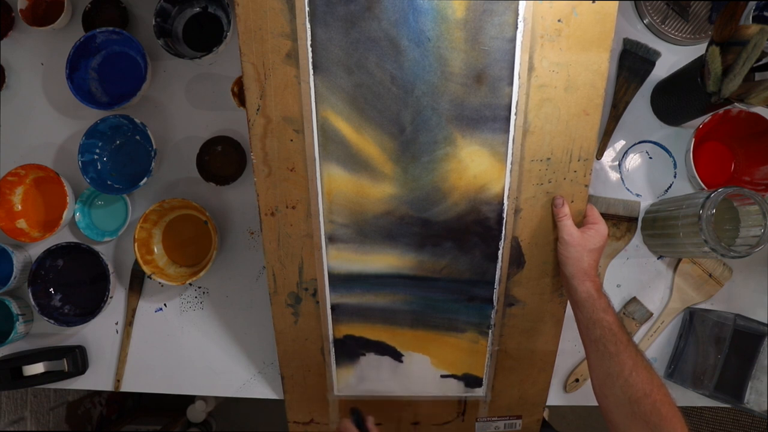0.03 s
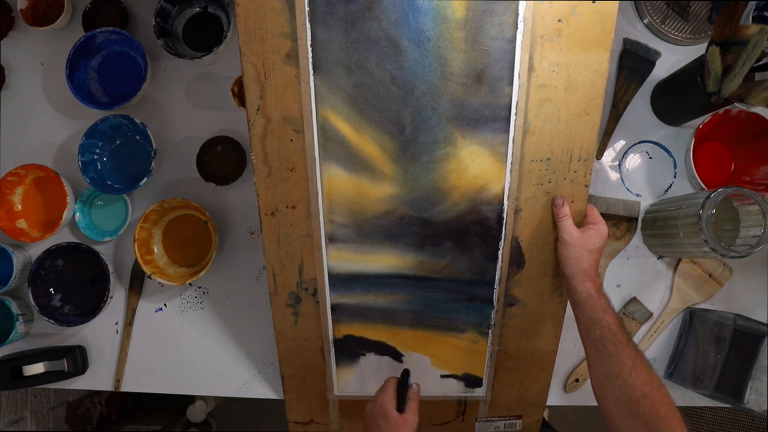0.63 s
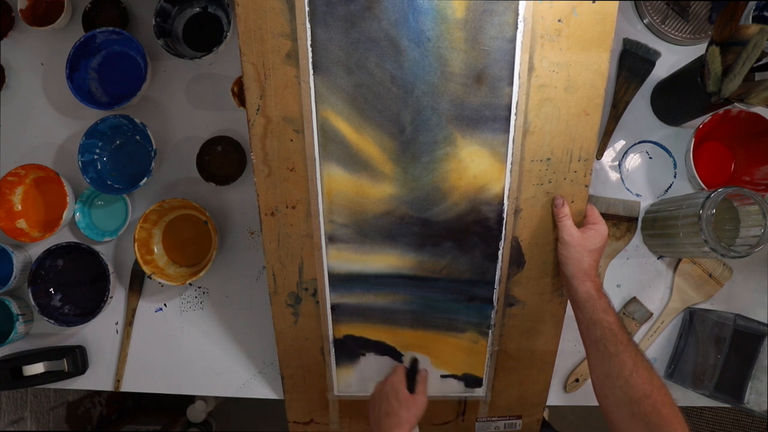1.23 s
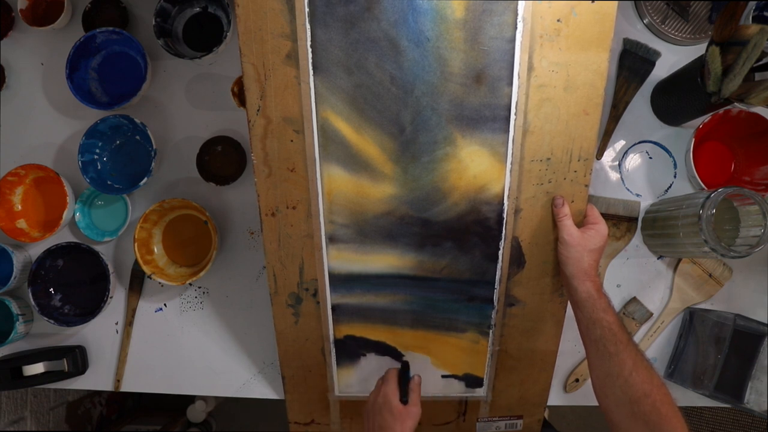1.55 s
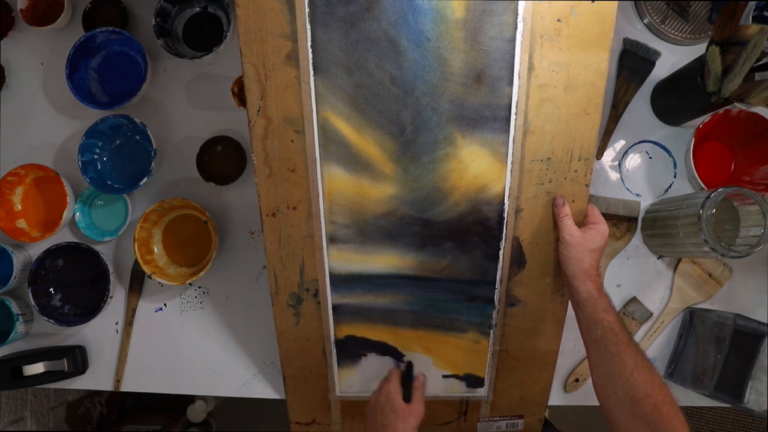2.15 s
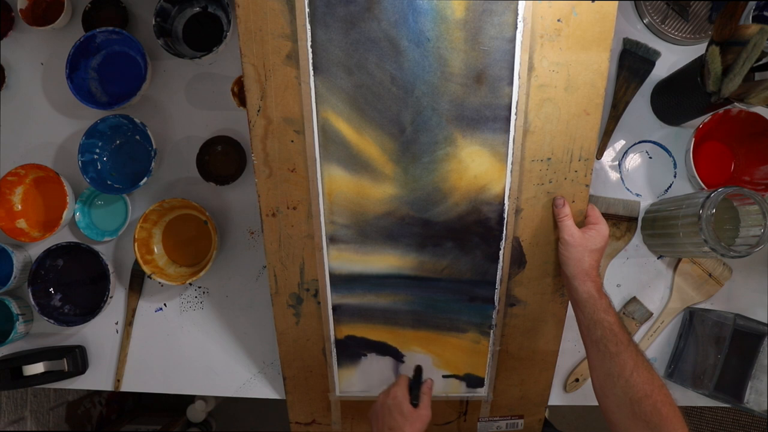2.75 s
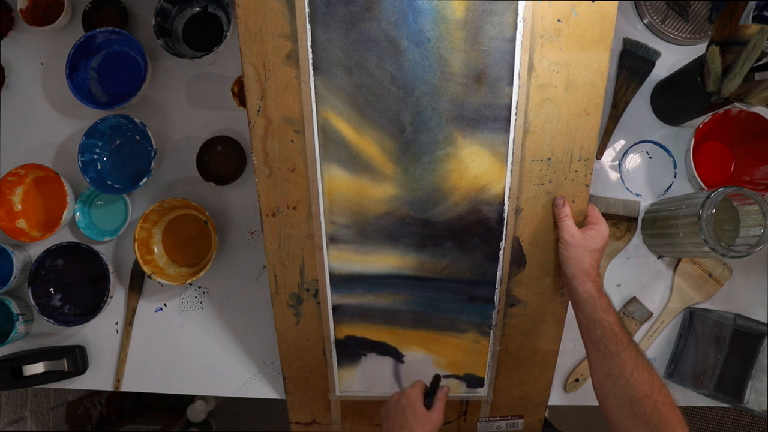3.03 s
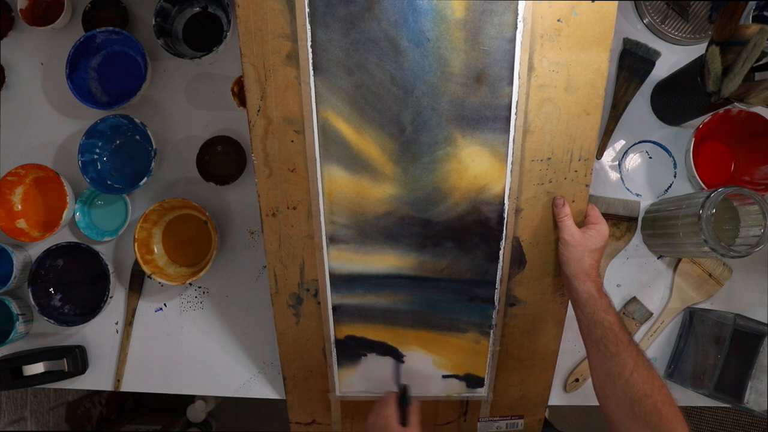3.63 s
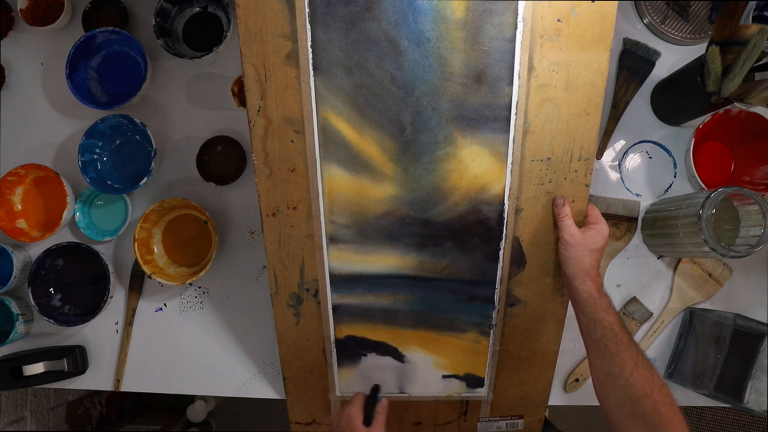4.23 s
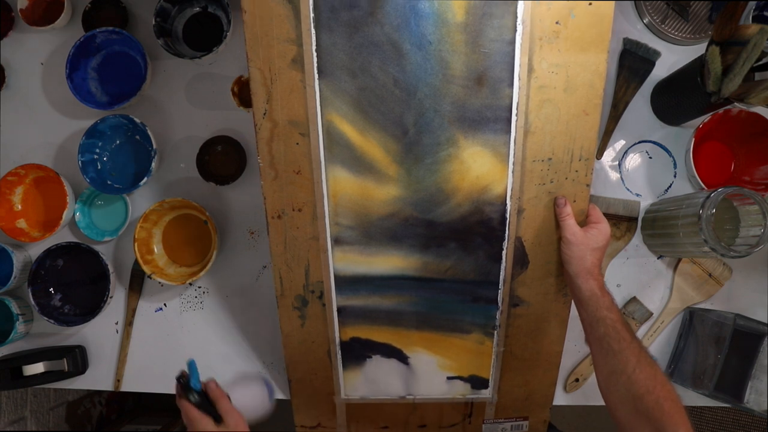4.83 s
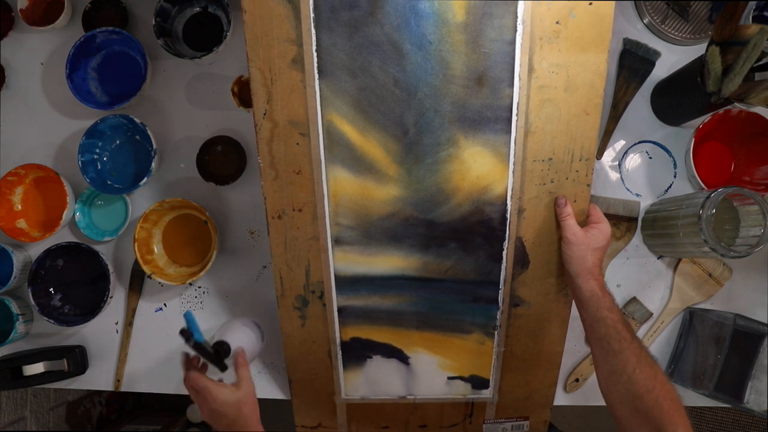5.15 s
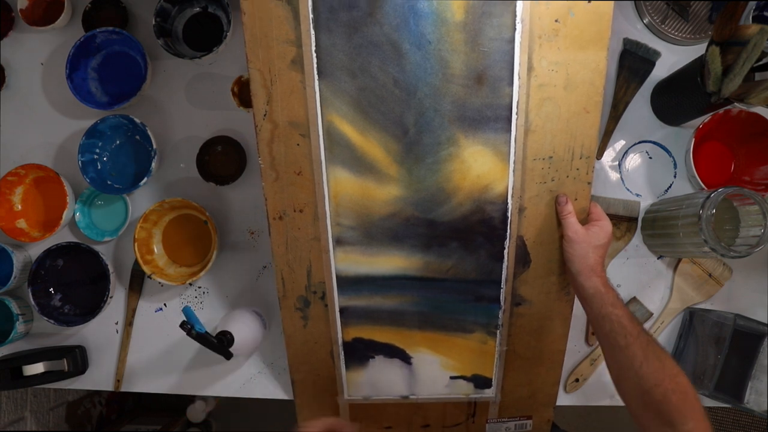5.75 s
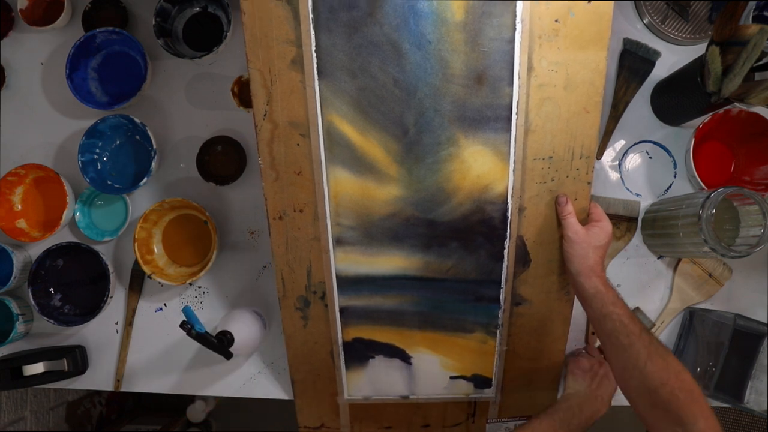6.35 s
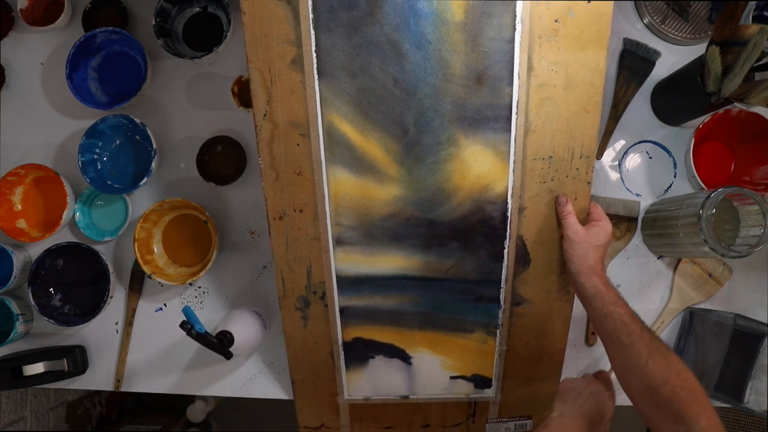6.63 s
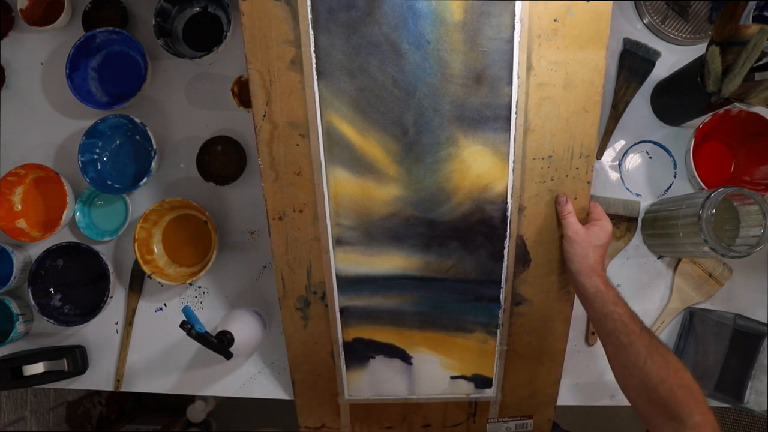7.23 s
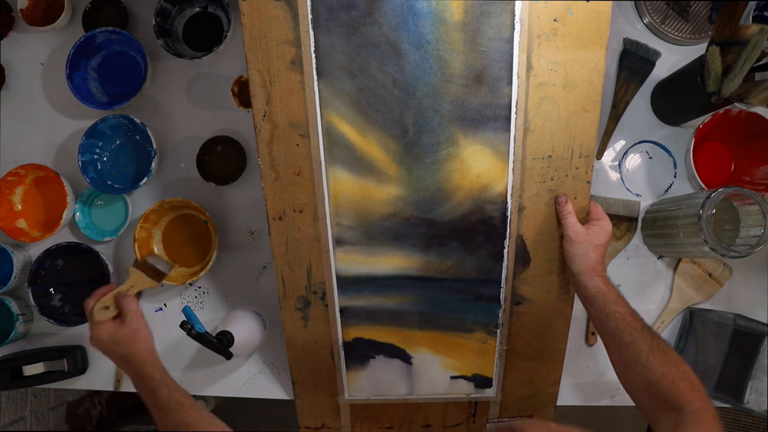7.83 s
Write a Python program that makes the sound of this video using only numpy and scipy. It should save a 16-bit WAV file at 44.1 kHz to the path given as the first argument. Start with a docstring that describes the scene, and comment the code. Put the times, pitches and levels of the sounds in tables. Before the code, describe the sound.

Quick spritzes from a trigger sprayer with water plopping inside, then the bottle knocks onto a table and a brush softly scrapes.

```python
"""Misting paper with a spray bottle

A painter pumps a trigger sprayer close to one microphone in a small studio. Each pull creaks and clicks,
the jet tears into a hiss of droplets, and air pockets plop in the water. The bottle is then thumped
down on a table, where jars clink, and a brush is picked up with soft bumps and scrapes on the wood."""
import sys
import numpy as np
from scipy import signal
from scipy.fft import rfft, irfft, next_fast_len
from scipy.io import wavfile

SR = 44100
rng = np.random.default_rng(int(sys.argv[2]) if len(sys.argv) > 2 else 0)


def generate_wav(signal):
    """Clip the signal to [-1, 1] and save it as 16-bit WAV at the path in sys.argv[1]."""
    frames = np.transpose(np.atleast_2d(signal))
    scaled = np.clip(frames, -1, 1) * 32767
    pcm = np.round(scaled).astype(np.int16)
    wavfile.write(sys.argv[1], SR, pcm)


N = 357210
TIME = np.arange(N) / SR
AGE = np.arange(SR) / SR   # time since a blow [s]

# trigger pulls, the first already under way: (time [s], click [dB], click centre [Hz], creak [dB],
# swell [s], hiss [dB], opening sag [dB], rush [dB re hiss], top [dB re hiss], sheen [dB re hiss],
# sheen delay [s], slosh [dB])
PULLS = [(-0.07, -25, 1500, -60, .065, -30.5, 12, -2, -6, -8, 0.094, -52.5),
         (0.914, -20, 1400, -54, 0.08, -33.5, 23, -2, -2.5, -20, 0.12, -59),
         (1.262, -22.5, 1600, -73, 0.09, -33.5, 37, -1, -1, -16, 0.12, -44),
         (1.669, -22, 1000, -47.5, 0.078, -30.5, 13, -3, -4, -16, 0.12, -50.5),
         (1.962, -22, 1240, -47, 0.089, -32, 28, -4, -1, -2, 0.13, -48.5),
         (2.292, -22, 700, -51, 0.067, -28, 39, -5.5, -1.5, 3, 0.097, -46.5),
         (2.655, -27.5, 1000, -53, 0.076, -30, 16, -4, -3, 5.5, 0.1, -48.5),
         (2.961, -20, 1040, -46, 0.09, -28.5, 12.5, -6.5, -3.5, -3, 0.084, -50),
         (3.326, -16.5, 3600, -52, 0.089, -30, 5, -5, -3, 1, 0.061, -48.5),
         (4.128, -16, 1550, -53.5, 0.074, -30.5, 9, -3, -5.5, -6, 0.11, -47.5),
         (4.375, -22.5, 2100, -54, 0.045, -31.5, 24, -5, -4, -6, .05, -54)]
# the trigger springs back and the pump refills: (time [s], click [dB], snap [dB re click], gulp [dB])
RETURNS = [(0.206, -41.5, -20, -54), (1.544, -20, -2.5, -28.5), (1.882, -23, -21, -21.5),
           (2.203, -33.5, -14, -28.5), (2.585, -31, 4.5, -41), (2.909, -24.5, -2, -28.5),
           (3.242, -24.5, 4, -30), (4.333, -24.5, -13, -26.5)]
# the bottle lands and rocks: (time [s], crack [dB], crack centre [Hz], body [dB], frame [dB], top [dB])
LANDINGS = [(4.9673, -10.5, 3980, -18.5, -12, -9), (5.1433, -27, 3140, -27.5, -25.5, -35),
            (5.187, -13, 1910, -19.5, -15.5, -28.5), (5.232, -30, 1800, -30.5, -27, -23.5),
            (5.405, -43, 1700, -41, -34.5, -37)]
# dull colour of the wooden table: (frequency [Hz], level [dB])
WOOD = [(40, -2.5), (70, -1), (130, -0.5), (200, 4), (290, -1), (370, -6.5), (510, 0.5), (660, -21),
        (1000, -19), (2000, -34), (4000, -62), (8000, -75.5)]


def from_db(db):
    """Decibels to gain."""
    return 10 ** (np.asarray(db) / 20)


def rms_one(x):
    """Scale to unit power."""
    return x / np.sqrt(np.mean(x ** 2) + 1e-20)


def at_hz(points, hz):
    """Read a curve on a log-frequency axis."""
    points = np.array(points)
    return np.interp(np.log(np.maximum(hz, 1)), np.log(points[:, 0]), points[:, 1])


def noise(spectrum, size=N):
    """Noise of a given colour, rms 1."""
    gain = from_db(at_hz(spectrum, np.fft.rfftfreq(size, 1 / SR)))
    return rms_one(irfft(rfft(rng.standard_normal(size)) * gain, size))


def band(x, low_hz, high_hz, order=2):
    """Butterworth band-pass."""
    sos = signal.butter(order, [low_hz, min(high_hz, .45 * SR)], "band", fs=SR, output="sos")
    return signal.sosfilt(sos, x)


def focused(spectrum, centre_hz, slope_db):
    """Narrow a colour by slope_db an octave on both sides of a centre."""
    return [(hz, at_hz(spectrum, hz) - slope_db * abs(np.log2(hz / centre_hz)))
            for hz in np.geomspace(100, 16000, 30)]


def flutter(per_s, depth_db):
    """A gain that wanders at random."""
    knots = rng.standard_normal(N)
    return from_db(depth_db * np.interp(TIME * per_s, np.arange(N), knots))


def swell(middle_s, half_s):
    """A smooth rise and fall of height 1."""
    return np.exp(-.5 * np.minimum(((TIME - middle_s) / half_s) ** 2, 100))


def decay(t60):
    """Exponential decay after a blow."""
    return from_db(-60 * AGE / max(t60, 1e-3))


def burst(spectrum, t60, attack_s=0.0001):
    """Many close, quickly damped modes struck at once."""
    return noise(spectrum, size=SR) * decay(t60) * (1 - np.exp(-AGE / attack_s))


def ringing(modes):
    """Damped sines, each with a slightly new strength and either sign at every blow."""
    return sum(rng.choice([-1, 1]) * from_db(db + rng.standard_normal())
               * np.sin(2 * np.pi * hz * AGE) * decay(t60) for hz, db, t60 in modes)


def grains(per_s, spectrum, t60, spread_db):
    """Random impacts of uneven size, each one of six short bursts; rms 1."""
    sizes = from_db(spread_db * np.minimum(rng.exponential(1, N), 3)) * rng.choice([-1, 1], N)
    hits = sizes * (rng.random(N) < per_s / SR)
    kind = rng.integers(0, 6, N)
    return rms_one(sum(signal.oaconvolve(hits * (kind == k), burst(spectrum, t60)[:SR // 20])[:N]
                       for k in range(6)))


def bubble(hz, cycles, rise, onset_cycles):
    """An air pocket swells, rings and goes up in pitch as it nears the surface."""
    t60 = cycles / hz
    age = AGE[AGE < 2 * t60]
    pitch = hz * (1 + rise * (np.minimum(age / t60, 1) - .2))
    onset = 1 - np.exp(-(age * hz / onset_cycles) ** 2)
    return np.sin(2 * np.pi * np.cumsum(pitch) / SR) * from_db(-60 * age / t60) * onset


def add(track, s, sound):
    """Mix a sound in at a time; what falls outside the track is dropped."""
    start = round(s * SR)
    part = sound[max(-start, 0):N - start]
    track[max(start, 0):max(start, 0) + len(part)] += part


def studio(x, wet_db, early_db, predelay_s=0.0039):
    """Direct sound, a few early reflections and a short diffuse tail."""
    # decay of the room: (frequency [Hz], t60 [s])
    room_t60 = [(200, 0.52), (400, 0.29), (800, 0.55), (1500, 0.38), (4500, 0.34), (9000, 0.39),
                (16000, 0.22)]
    # reflections off the board, table and walls: (delay [s], level [dB])
    echoes = [(.0017, -46), (.0041, -16), (.0078, -13.5), (0.02, -16.5), (0.035, -20.5)]
    edges = np.geomspace(190, 18000, 10)
    tail = sum(band(rng.standard_normal(SR), lo, hi) * decay(at_hz(room_t60, np.sqrt(lo * hi)))
               for lo, hi in zip(edges, edges[1:]))
    tail *= np.clip(AGE / predelay_s - 1, 0, 1)
    out = x + from_db(wet_db) * signal.fftconvolve(x, tail / np.sqrt(np.sum(tail ** 2)))[:N]
    for s, db in echoes:
        add(out, s, from_db(db + early_db) * x)
    return out


def room_tone(air_db=-62.5, hum_hz=125.9, hum_db=-62.5, rumble_trim_db=-2):
    """A bed of still air, a wavering hum and a low rumble that comes and goes."""
    # colour of the still air: (frequency [Hz], level [dB])
    air_colour = [(29, -33.5), (50, -1.5), (122, 5), (306, -5), (362, -5.5), (520, -12), (601, -18),
                  (950, -15), (2210, -16.5), (4450, -24.5), (7040, -25.5), (13200, -26), (16000, -36)]
    # colour of the rumble: (frequency [Hz], level [dB])
    rumble_colour = [(10, -14), (20, -10.5), (30, 3), (43, 1.5), (60, -16.5), (100, -24), (250, -58.5)]
    # rise and fall of the rumble: (time [s], level [dB])
    rumble_ride = [(0.0, -69), (0.16, -55.5), (1.28, -76), (1.49, -42), (1.69, -50.5), (4.17, -79),
                   (4.51, -59), (4.58, -43.5), (4.92, -49), (5.01, -34), (5.16, -37), (5.23, -28.5),
                   (5.8, -58), (6.31, -45), (6.52, -53), (6.68, -41), (7.45, -55), (8.1, -48)]
    hum = from_db(hum_db) * np.sqrt(2) * np.sin(2 * np.pi * hum_hz * TIME) * flutter(19, 1.8)
    rumble_db = np.interp(TIME, *np.transpose(rumble_ride)) + rumble_trim_db
    rumble = from_db(rumble_db) * noise(rumble_colour)
    return from_db(air_db) * noise(air_colour) + hum + rumble


def sliding(rub_trim_db=-3, shuffle_trim_db=-6):
    """Sleeve and brush slide on wood: a grainy rub that rings in the handle, over a dull shuffle."""
    # strokes: (middle [s], half length [s], rub [dB], tilt [dB/octave], shuffle [dB], handle ring [dB])
    strokes = [(4.679, 0.068, -49.5, 1, -41, -73), (4.803, 0.031, -50, -.5, -50, -54),
               (5.217, 0.23, -50, -6.5, -42, -80), (5.68, 0.043, -58, -6, -54, -72),
               (6.06, 0.078, -60.5, 0.5, -57, -74), (6.305, 0.012, -57, 11, -60, -68),
               (6.38, 0.087, -51.5, -5.5, -47, -59.5), (6.563, 0.027, -43, 0.5, -38.5, -56),
               (6.9, 0.2, -64.5, -0.5, -55, -88), (7.135, 0.044, -66, 7, -63, -78),
               (7.328, 0.078, -58, 1, -71, -59.5), (7.683, 0.12, -59, 1.5, -54.5, -78),
               (7.849, 0.024, -59, -3, -40, -80), (8.03, 0.08, -59, -5, -48.5, -73)]
    # colour of the friction: (frequency [Hz], level [dB])
    rub_colour = [(350, -16), (600, -1.5), (1100, 1), (1600, 2.5), (2200, 0), (3300, -3), (4300, -1.5),
                  (5700, -5), (7500, -11), (11000, -13), (16000, -18.5)]
    # resonances of the brush handle: (frequency [Hz], width [Hz], level [dB])
    handle = [(2200, 260, 6), (3300, 410, 4.5), (4380, 370, 4.5), (5760, 480, 4)]
    rub = noise(rub_colour) * flutter(400, 1.9)
    shuffle = rms_one(band(noise(WOOD), 93, 770)) * flutter(40, 0.87)
    scrape = rms_one(sum(from_db(db) * band(rub, hz - width / 2, hz + width / 2, order=1)
                         for hz, width, db in handle))
    size = next_fast_len(N)
    spectrum = rfft(rub, size)
    octaves = np.log2(np.maximum(np.fft.rfftfreq(size, 1 / SR), 300) / 3000)
    out = np.zeros(N)
    for s, half_s, rub_db, tilt_db, shuffle_db, ring_db in strokes:
        tilted = rms_one(irfft(spectrum * from_db(tilt_db * octaves), size)[:N])
        out += swell(s, half_s) * (from_db(rub_db + rub_trim_db) * tilted
                                   + from_db(shuffle_db + shuffle_trim_db) * shuffle
                                   + from_db(ring_db) * scrape)
    return out


def handling(thud_trim_db=-1):
    """Hand and brush thud and tick on the wood, and the brush sets a cup ringing."""
    # bumps on the wood: (time [s], thud [dB], tick [dB], tick centre [Hz], tick t60 [s])
    bumps = [(4.575, -45, -40.5, 1500, .06), (5.879, -60.5, -56, 2200, 0.13),
             (6.008, -71, -41.5, 1830, 0.019), (6.169, -33.5, -47.5, 3500, 0.066),
             (6.219, -35, -39.5, 3700, 0.075), (6.298, -63, -44.5, 5360, 0.13),
             (6.314, -33.5, -47, 1000, 0.094), (6.387, -35.5, -29.5, 2230, 0.13),
             (6.486, -50, -42, 2940, 0.48), (6.565, -37.5, -37.5, 7240, .12),
             (6.831, -47.5, -72, 1490, .06), (7.258, -42.5, -66, 1500, .06), (7.312, -67, -50, 2900, 0.031),
             (7.589, -37, -60, 1200, .06), (7.675, -43, -62, 1200, 0.053), (7.746, -63, -50, 12000, 0.086),
             (7.831, -38.5, -51, 1200, 0.055), (7.968, -43, -46, 2280, 0.048)]
    # colour of a hard contact: (frequency [Hz], level [dB])
    tick_colour = [(200, -18.5), (520, 6.5), (1000, 1.5), (1500, -4), (2300, -8.5), (3300, -5.5),
                   (5000, -11), (7500, -19.5), (16000, -31)]
    # taps on the cup: (time [s], level [dB])
    cup_taps = [(7.311, -47.5), (7.969, -51)]
    # modes of the cup: (frequency [Hz], level [dB], t60 [s])
    cup_modes = [(1590, -9, 0.13), (1990, -12, 0.2), (2400, -6, 0.16), (2900, 2.5, 0.066),
                 (3400, -10, 0.085)]
    out = np.zeros(N)
    for s, thud_db, tick_db, hz, t60 in bumps:
        add(out, s, from_db(thud_db + thud_trim_db) * burst(WOOD, t60=0.24, attack_s=0.0012))
        add(out, s, from_db(tick_db) * burst(focused(tick_colour, hz, slope_db=5), t60))
    for s, db in cup_taps:
        add(out, s, from_db(db) * ringing(cup_modes))
    return out


def landing(top_hz=130.9, top_t60=0.33, frame_trim_db=-1, slope_db=5):
    """The hard base cracks on the table, the bottle knocks, the top booms and jars rattle and ring."""
    # modes of the bottle's stiff base: (frequency [Hz], level [dB], t60 [s])
    base_modes = [(420, -4, .06), (660, 5.5, 0.034), (746, -5, .05), (970, -20.5, 0.026),
                  (1330, -12.5, 0.03), (1850, -10.5, 0.026), (2100, -1.5, 0.023), (2360, -12.5, 0.053),
                  (2630, -6, 0.029), (3000, -4, 0.01), (3700, -5.5, 0.01), (4180, -5.5, 0.014),
                  (4540, -4.5, 0.0074), (5000, -3, .009), (6130, -6.5, 0.006), (7500, -12, .003)]
    # knock of the bottle's body: (frequency [Hz], level [dB])
    body_colour = [(60, -11.5), (130, -10.5), (230, 1.5), (400, -1.5), (580, -4.5), (950, -2.5), (1450, -9),
                   (2150, -11.5), (3300, -22.5), (4500, -20), (8000, -33.5), (16000, -48)]
    # modes of the table's frame: (frequency [Hz], level [dB], t60 [s])
    frame_modes = [(43, -20.5, 0.61), (51.2, -20, 0.48), (72.3, -6.5, 0.35), (93, -16.5, 0.68),
                   (158, -4.5, 0.13), (209, -11.5, 0.47), (229, -11, 0.27), (302, -21.5, 0.47),
                   (315, -11, 0.44), (400, -27, 0.72), (511, -21.5, 0.35), (579, -18.5, .3),
                   (744, -26, 0.2)]
    # modes of the jars: (frequency [Hz], level [dB], t60 [s])
    jar_modes = [(1122, -26, 0.99), (2770, -43, 0.62), (2810, -28, 0.5), (2680, -19, 0.28)]
    out, jars = np.zeros((2, N))
    build_up = 1 - np.exp(-AGE / 0.012)   # the heavy table takes a moment to swing
    drum = np.sin(2 * np.pi * top_hz * AGE) * decay(top_t60)
    for s, crack_db, centre_hz, body_db, frame_db, top_db in LANDINGS:
        # the point of contact picks the modes
        struck = [(hz, db - slope_db * abs(np.log2(hz / centre_hz)), t60) for hz, db, t60 in base_modes]
        add(out, s, from_db(crack_db) * ringing(struck))
        add(out, s, from_db(body_db) * burst(body_colour, t60=0.086))
        boom = from_db(frame_db + frame_trim_db) * ringing(frame_modes) + from_db(top_db) * drum
        add(out, s, boom * build_up)
        add(jars, s, from_db(body_db) * ringing(jar_modes))
    return out + jars * flutter(60, 3.9)


def gurgle(count=420, spread_db=5):
    """A swarm of small bubbles of many sizes, born at random until the bottle is put down; rms 1."""
    put_down_s = LANDINGS[0][0]
    out = np.zeros(N)
    for when, pitch, strength in rng.random((count, 3)):
        gain = from_db(spread_db * -np.log(1 - .95 * strength))
        blip = bubble(600 * 8 ** pitch, cycles=9.7, rise=0.097, onset_cycles=2.7)
        add(out, when * put_down_s, gain * blip)
    return rms_one(out)


def trickle(bubble_trim_db=2, fizz_db=-27.5, fizz_t60=0.36, slosh_delay_s=0.2):
    """Tiny bubbles sucked through the valve stir the water, which also swings back after each pull."""
    # valve bubbles: (time [s], level [dB], pitch [Hz], ring [cycles])
    valve_bubbles = [(0.346, -17, 3080, 41), (0.396, -18.5, 4250, 28), (0.482, -42, 5330, 120),
                     (0.871, -38.5, 1270, 53), (0.892, -34, 1490, 24), (1.547, -36.5, 1080, 110),
                     (3.182, -34, 1300, 32), (3.682, -37, 2600, 17), (3.858, -21, 3140, 13),
                     (3.87, -30.5, 2630, 27), (3.988, -50, 2900, 40)]
    # colour of the slosh: (frequency [Hz], level [dB])
    slosh_colour = [(150, -19), (280, 19.5), (500, 2.5), (800, -4.5), (1500, 5.5), (3000, -5.5),
                    (4600, 9.5), (7000, -13), (16000, -40)]
    water = from_db(-6) * noise(slosh_colour) * flutter(140, 6.9) + from_db(-9) * gurgle()
    stir = sum(from_db(db) * swell(s + slosh_delay_s, half_s=0.087) for s, *_, db in PULLS)
    out = np.zeros(N)
    for s, db, hz, cycles in valve_bubbles:
        add(out, s, from_db(db + bubble_trim_db) * bubble(hz, cycles, rise=.08, onset_cycles=2.0))
        add(stir, s, from_db(db + fizz_db) * decay(fizz_t60))
    return out + stir * water


def plops(trim_db=5, gulp_db=-8.5, gulp_hz=304, refill_hz=274, gulp_cycles=10.4, overtone_ratio=2.035):
    """Air pockets in the water: a gulp at every pull and return, big plops when the bottle is shaken."""
    # big air pockets: (time [s], level [dB], pitch [Hz], ring [cycles], overtone [dB re plop])
    big_plops = [(0.047, -34.5, 350, 22, 1), (1.344, -8.5, 382, 7, -9.5), (1.512, -24, 284, 6.2, -8),
                 (1.699, -25, 315, 27, -20), (2.393, -14, 349.5, 19.6, -15), (2.506, -34, 335, 36, -26),
                 (2.677, -31, 312, 26, -15), (3.429, -13.5, 388, 18.5, -27), (3.894, -27, 346, 15.5, 0.5)]
    pockets = [(s, db + gulp_db, gulp_hz, gulp_cycles) for s, db, *_ in PULLS]
    pockets += [(s, db, refill_hz, gulp_cycles) for s, _, _, db in RETURNS]
    for s, db, hz, cycles, overtone_db in big_plops:   # a smaller pocket breaks off with each plop
        pockets += [(s, db, hz, cycles), (s, db + overtone_db, hz * overtone_ratio, cycles)]
    out = np.zeros(N)
    for s, db, hz, cycles in pockets:
        add(out, s, from_db(db + trim_db) * bubble(hz, cycles, rise=0.023, onset_cycles=1.0))
    return out


def creaks(per_s=80, lead_s=0.022):
    """The plastic sticks and slips as the fingers take up the slack before each pull."""
    colour = [(100, -45), (250, 9), (700, -5.5), (1500, -6.5), (4500, -3.5), (12000, -30)]
    grip = sum(from_db(db) * swell(s - lead_s, half_s=0.023) for s, _, _, db, *_ in PULLS)
    return grip * grains(per_s, colour, t60=.02, spread_db=6.5)


def trigger(trim_db=-3, snap_trim_db=-2, return_hz=870):
    """Plastic parts hit their stops on every pull and return: a short clack under a bright snap."""
    # loose play of the parts: (time [s], level [dB], centre [Hz], snap [dB], narrowing [dB/octave])
    loose_clicks = [(0.346, -20, 3035, -35, 13), (0.357, -26, 3020, 3, 7), (0.531, -40.5, 1440, 4.5, 0),
                    (0.587, -38.5, 3780, -3, 4), (0.636, -30, 2420, -32, 14), (0.662, -37, 724, -7, 2.5),
                    (0.829, -29.5, 1140, -14, 10), (0.852, -43.5, 923, 12, 0), (1.571, -29, 775, -1, 25),
                    (1.688, -19, 1310, 4.5, 5), (1.92, -23, 1590, -1, 0), (1.927, -28, 1590, 4, 7),
                    (2.243, -23, 1690, 2, 2), (2.27, -28, 1670, -18, 9), (2.379, -20, 710, 9, 12),
                    (2.664, -22, 3750, 10.5, 21), (2.672, -25, 3750, 5, 5), (2.876, -26.5, 775, -22, 6),
                    (2.929, -26.5, 1250, 0, 15), (3.749, -30.5, 1600, -34, 14.5),
                    (3.816, -19, 4730, -34, 6.5), (3.894, -22, 690, -31, 1.5), (4.356, -23.5, 4220, 5, 4),
                    (4.604, -33, 4810, 2, 31), (4.783, -22, 2250, -2.5, 7)]
    # clack of the plastic: (frequency [Hz], level [dB])
    clack_colour = [(200, -9.5), (500, 7.5), (900, 8), (1500, 5), (3000, 1), (4500, 4), (7000, -9.5),
                    (16000, -22.5)]
    snap_colour = [(3000, -18), (7000, -10.5), (16000, -25)]
    pull_clicks = [(s, db, hz, -2.5, 4) for s, db, hz, *_ in PULLS]
    return_clicks = [(s, db, return_hz, snap_db, 1.5) for s, db, snap_db, _ in RETURNS]
    out = np.zeros(N)
    for s, db, hz, snap_db, slope_db in pull_clicks + return_clicks + loose_clicks:
        clack = burst(focused(clack_colour, hz, slope_db), t60=0.032, attack_s=0.0025)
        snap = burst(snap_colour, t60=0.011, attack_s=0.0005)
        add(out, s, from_db(db + trim_db) * (clack + from_db(snap_db + snap_trim_db) * snap))
    return out


def pressure_db(swell_s, sag_db, fall_db_per_s=267, rounding_s=0.027):
    """Pump pressure re its peak: it opens part way, arches up, rounds off and falls steadily."""
    rising = np.clip(1 - AGE / swell_s, 0, 1)
    falling = np.hypot(np.maximum(AGE - swell_s, 0), rounding_s) - rounding_s
    return -sag_db * rising ** 2 - fall_db_per_s * falling


def mist(trim_db=-1, rush_trim_db=1.16, drops_per_s=2500, sputter_db=1.25, opening_s=0.0095):
    """The jet tears into droplets: a sputtering hiss that follows the pump's pressure."""
    # colour of the jet: (frequency [Hz], level [dB])
    jet_colour = [(120, -41), (210, -47), (310, -8.5), (560, -11.5), (770, -6), (1060, -10.5), (1550, -1.5),
                  (2100, -3), (2950, 0.5), (4300, 8), (5300, 7), (6800, -1), (9500, -7), (14000, -11.5)]
    spit_colour = [(120, -45), (300, -16), (700, -5), (1600, -0.5), (3000, -0.5), (8000, -16)]
    rush_follows, top_follows = 0.72, 0.81   # shares of the hiss's swing in dB
    drops = (rng.random(N) < drops_per_s / SR) * rng.standard_normal(N)   # patter on the paper
    jet = noise(jet_colour) + from_db(-8) * rms_one(band(drops, 3000, 15000, order=1))
    rush, hiss, top = [rms_one(band(jet, lo, hi, order=4))
                       for lo, hi in [(220, 2780), (3400, 7870), (8200, .45 * SR)]]
    finest = rms_one(band(rng.standard_normal(N), 11500, 19000, order=3))
    spit = grains(130, spit_colour, t60=0.017, spread_db=2.5)   # big drops spat with the mist
    rush = rush + from_db(-8.5) * spit
    top = from_db(-1) * top + from_db(-12) * finest
    out = np.zeros(N)
    for s, _, _, _, swell_s, hiss_db, sag_db, rush_db, top_db, sheen_db, sheen_s, _ in PULLS:
        force_db = pressure_db(swell_s, sag_db)
        valve = from_db(hiss_db + trim_db) * np.minimum(AGE / opening_s, 1)
        span = (round(s * SR) + np.arange(SR)) % N
        # the highest hiss is beamed most narrowly and flashes as the nozzle swings past the microphone
        sheen = from_db(sheen_db) * swell(sheen_s, half_s=0.015)[:SR]
        add(out, s, valve * (from_db(force_db) * hiss[span]
                             + from_db(rush_follows * force_db + rush_db + rush_trim_db) * rush[span]
                             + from_db(top_follows * force_db + top_db) * top[span]
                             + sheen * finest[span]))
    return out * flutter(1500, sputter_db) * flutter(90, 0.48)


def scene():
    """Each source gets its own share of room and reaches one microphone, the same in both channels."""
    spray = studio(mist(), wet_db=-15, early_db=-6)
    pump = studio(trigger() + creaks(), wet_db=-6.5, early_db=2)
    water = studio(trickle(), wet_db=-8, early_db=-17)
    water += studio(plops(), wet_db=-5.5, early_db=1)
    thump = studio(landing(), wet_db=-8, early_db=-12)
    brush = studio(sliding() + handling(), wet_db=-7, early_db=-22)
    return np.tile(spray + pump + water + thump + brush + room_tone(), (2, 1))


def record(dry):
    """A steep low-pass shaves off the very top."""
    cutoff_hz = 15950
    return signal.sosfilt(signal.ellip(12, .1, 80, cutoff_hz, fs=SR, output="sos"), dry)


dry = scene()
out = record(dry)
generate_wav(out)
```